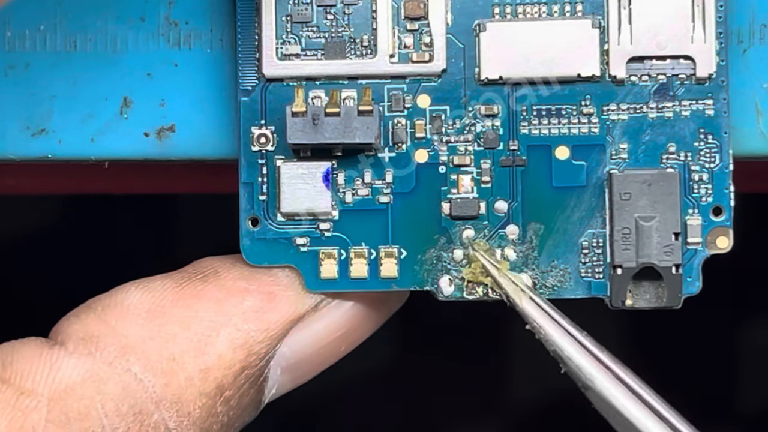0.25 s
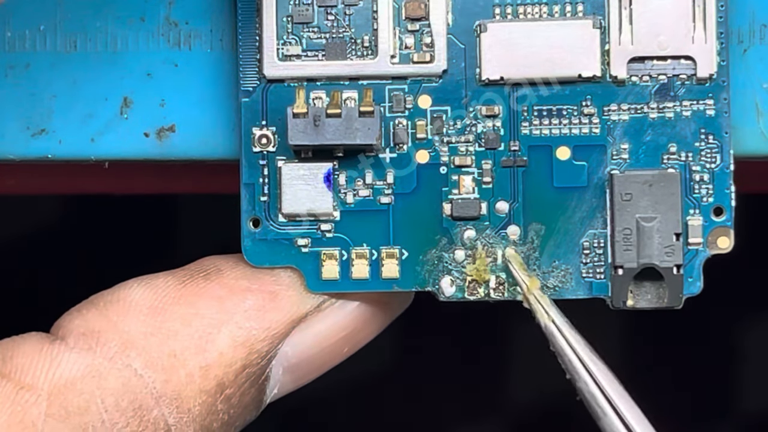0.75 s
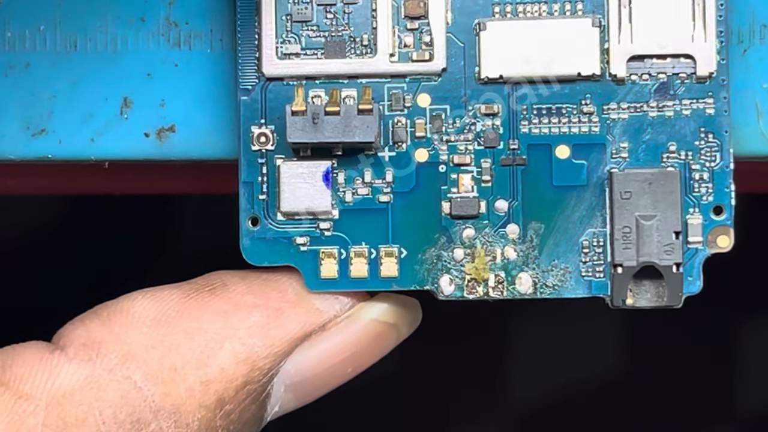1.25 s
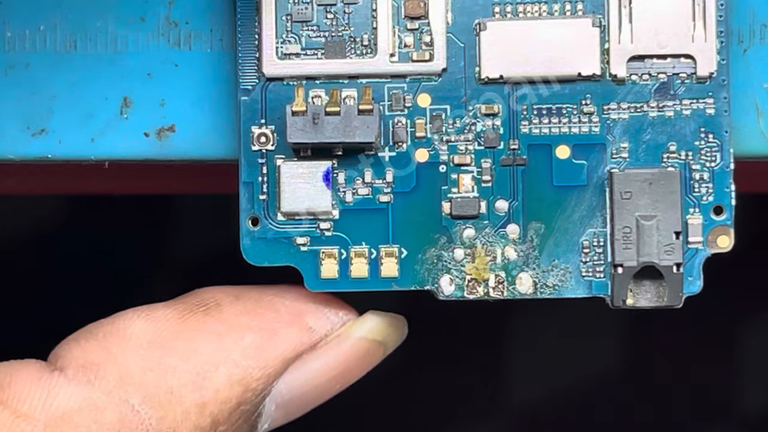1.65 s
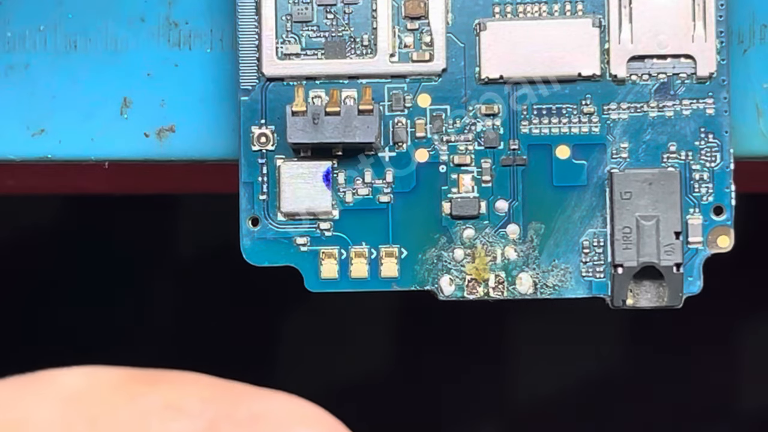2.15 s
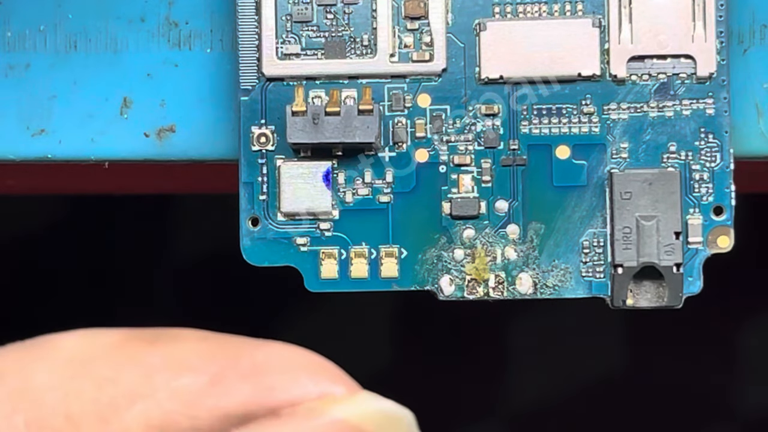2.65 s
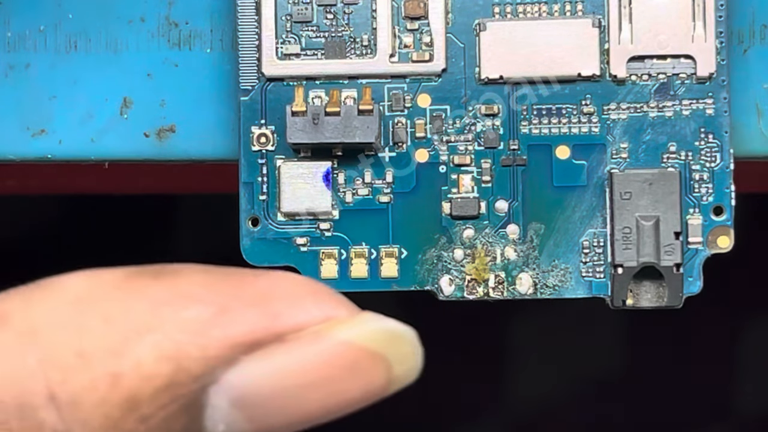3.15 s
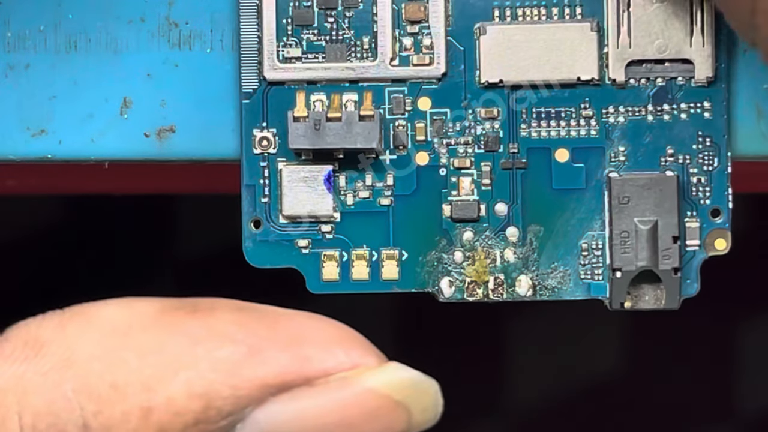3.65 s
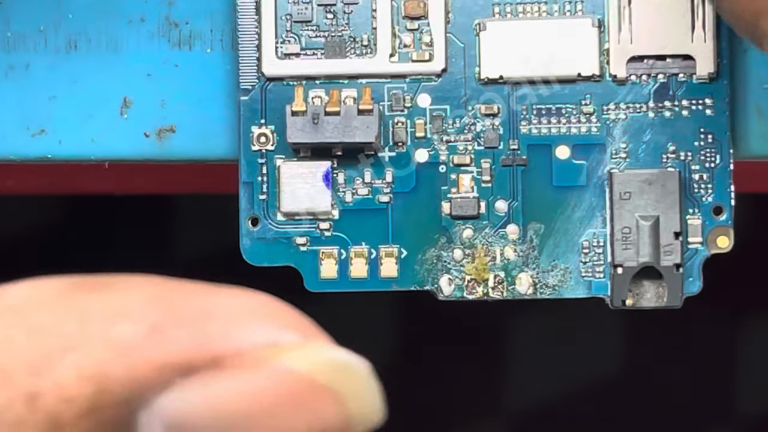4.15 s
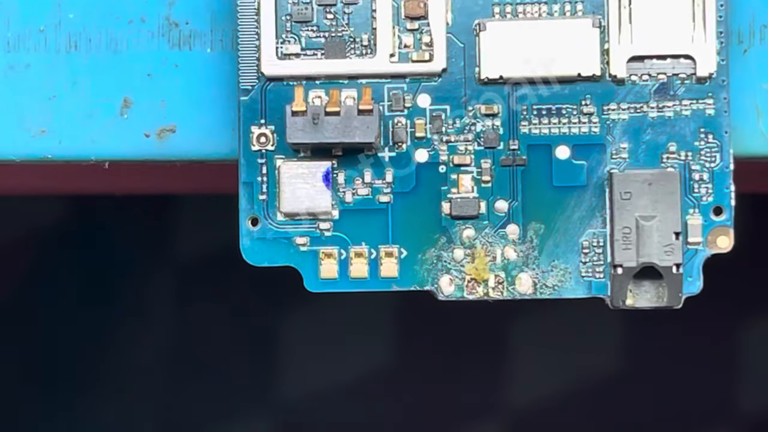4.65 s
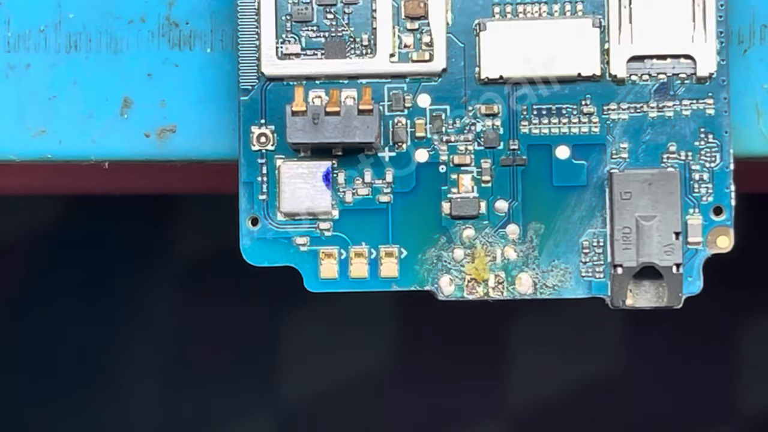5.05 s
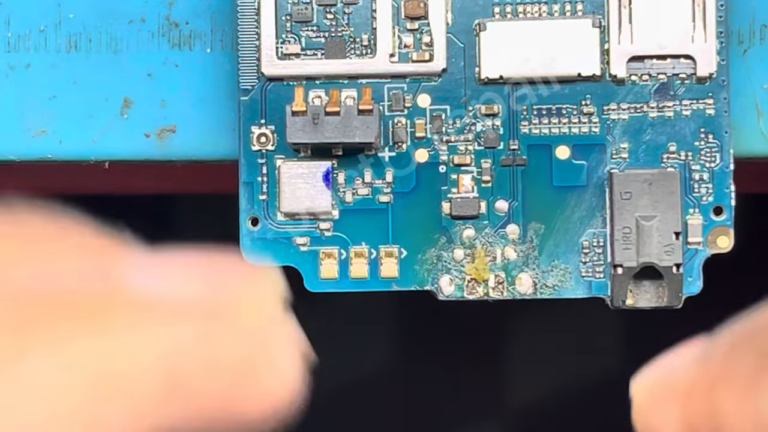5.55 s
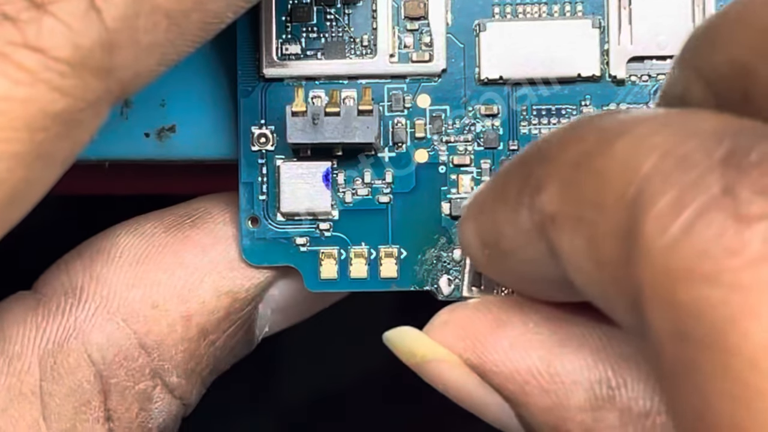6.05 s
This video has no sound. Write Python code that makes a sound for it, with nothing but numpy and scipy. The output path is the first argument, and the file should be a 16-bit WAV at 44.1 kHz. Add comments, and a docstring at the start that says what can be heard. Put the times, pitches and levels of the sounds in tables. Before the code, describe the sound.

Quiet close repair work: tiny clicks, a sudden hard clank and rattle of dropped tweezers, then soft snaps and skin rubs over low bench rumble.

```python
"""Still air and a low bench rumble, then a faint tick: steel tweezers pick at a small circuit board.
Dropped on the workbench, they thud, bounce, ring and rattle to rest: decaying modes, noise cracks and a buzz.
Fingers then press a tiny connector on the board: gritty noise ticks, swelling skin rubs, soft sine bumps.
A quiet room adds a dull tail; two close ports of a phone above the work make the stereo."""
import sys
import numpy as np
from scipy import signal
from scipy.fft import rfft, irfft, next_fast_len
from scipy.io import wavfile
from scipy.ndimage import uniform_filter1d

SR = 44100
rng = np.random.default_rng(int(sys.argv[2]) if len(sys.argv) > 2 else 0)


def output_pcm(signal):
    """Save a mono or channel-first signal as 16-bit PCM at the path in sys.argv[1].

    Samples are clipped to [-1, 1] before scaling.
    """
    pcm = np.clip(np.atleast_2d(signal).T, -1, 1) * 32767
    wavfile.write(sys.argv[1], SR, np.round(pcm).astype(np.int16))


N = 277830
TIME = np.arange(N) / SR
AGE = np.arange(int(.7 * SR)) / SR  # time since the onset of one sound, s


def from_db(db):
    """Decibels to gain."""
    return 10 ** (np.asarray(db) / 20)


def rms_one(x):
    """Scale to unit power."""
    return x / np.sqrt(np.mean(x ** 2) + 1e-20)


def at_hz(points, hz):
    """Read a spectrum on a log-frequency axis."""
    f, value = np.transpose(points)
    return np.interp(np.log(hz + 1), np.log(f), value)


def add(track, s, sound):
    """Mix a sound into a stereo track from time s on."""
    start = max(round(s * SR), 0)
    track[:, start:start + sound.shape[-1]] += sound[..., :N - start]


def dying(t60, rise=0.0004):
    """Quick rise, then an exponential decay; both times in seconds."""
    return from_db(-60 * AGE / t60) * (1 - np.exp(-AGE / rise))


# unshared part of diffuse sound at the two ports: freq_hz, level_db
PORT_SPREAD = [(60, -34.5), (250, -9), (600, -1.5), (1200, -2.5), (2500, -10.5), (4500, -14), (6000, -23.5),
               (8500, -8.5), (10200, -27), (14000, -13)]


def noise(spectrum, size):
    """Coloured stereo noise of unit power, mostly shared by both ports."""
    fft_size = next_fast_len(size)
    hz = np.fft.rfftfreq(fft_size, 1 / SR)
    shared, own = rfft(rng.standard_normal((2, fft_size)))
    opposite = np.array([[1], [-1]])
    pair = shared + own * from_db(at_hz(PORT_SPREAD, hz)) * opposite
    coloured = irfft(pair * from_db(at_hz(spectrum, hz)), fft_size)
    return rms_one(coloured[:, :size])


def hump(centre_hz, fall_db):
    """A broad spectrum that falls by fall_db an octave away from its centre."""
    return [(centre_hz * 2. ** k, -fall_db * abs(k) ** 1.4) for k in np.linspace(-4, 2, 13)]


def softened(x, hz):
    """A softer contact passes less treble."""
    return signal.sosfilt(signal.butter(2, min(hz, SR / 3), fs=SR, output="sos"), x)


def ring(drive, hz, t60):
    """One mode as a resonator: a unit click sets a sine of height near 1 ringing."""
    radius = from_db(-60 / (t60 * SR))
    angle = 2 * np.pi * hz / SR
    return signal.lfilter([0, np.sin(angle)], [1, -2 * radius * np.cos(angle), radius ** 2], drive + 1e-18)


def grain(size, rough_db, count=30):
    """Uneven gain of many tiny slips, smoothed over count samples."""
    wander = rms_one(uniform_filter1d(rng.standard_normal(size), count))
    return rms_one(from_db(rough_db * wander))


# colour of the still air: freq_hz, level_db
AIR = [(100, 3), (500, 1.5), (900, -6.5), (1700, -6.5), (2400, -12), (4000, -12), (8000, -17),
       (13000, -20.5), (15000, -24), (16500, -44.5)]
AIR_DB = -72.5


def air():
    """The quiet room's steady hiss, strongest in the low end."""
    return from_db(AIR_DB) * noise(AIR, N)


# a hand moves and its sleeve with it: start_s, length_s, bench_rumble_db, soft_rustle_db (before trims)
MOVES = [(0, 0.039, -50.5, -64), (0.46, .08, -57, -64.5), (1.19, .47, -57, -66.5), (1.801, .25, -58.5, -94),
         (2.48, 0.17, -52, -74), (3.324, 0.42, -50, -58.5), (3.766, 0.4, -49, -75), (4.252, .33, -51, -100),
         (4.866, .19, -44, -88), (5.581, 0.16, -47.5, -78.5), (5.88, 0.06, -43, -61.5),
         (6.159, 0.088, -52, -55.5)]
# a short swell and fade around each move, over a floor that never quite rests
MOVE_ATTACK_S, MOVE_RELEASE_S = 0.052, .06
RESTING_RUMBLE_DB, RESTING_RUSTLE_DB = -58, -75.5  # before trims
# colour of the bench rumble: freq_hz, level_db
RUMBLE = [(20, -26.5), (35, -9), (58, 5.5), (80, -3), (115, -11.5), (170, -26), (300, -62.5)]
# colour of the sleeve rustle: freq_hz, level_db
RUSTLE = [(80, -13.5), (160, 3.5), (340, -2.5), (550, -18.5), (900, -23), (2000, -25.5), (5000, -46.5)]
# soft bumps of the bench, under the hands or the dropped tool: start_s, level_db (before trim), pitch_hz
BUMPS = [(0.496, -42, 108), (0.683, -45.5, 116), (2.183, -22, 61.2), (2.244, -20.5, 90.04),
         (2.457, -31, 88.9), (2.536, -41.5, 65), (3.384, -29, 89.87), (3.550, -31, 88.05),
         (3.684, -35, 118.7), (3.938, -37, 81.4), (5.596, -35, 63.3), (5.925, -35, 58.3)]


def hands(bump_t60=.085, bump_rise=0.0067, bump_trim_db=3, rumble_trim_db=-2, rustle_trim_db=-1):
    """Soft bumps and a low rumble come through the bench; sleeves rustle. Each move swells, holds and fades."""
    rumble, rustle = from_db(RESTING_RUMBLE_DB), from_db(RESTING_RUSTLE_DB)
    for s, length, move_rumble_db, move_rustle_db in MOVES:
        swell = np.clip((TIME - s) / MOVE_ATTACK_S, 0, 1)
        fade = np.clip(1 - (TIME - s - length) / MOVE_RELEASE_S, 0, 1)
        effort = swell * fade
        # unrelated noises add as powers
        rumble = np.hypot(rumble, from_db(move_rumble_db) * effort)
        rustle = np.hypot(rustle, from_db(move_rustle_db) * effort)
    out = from_db(rumble_trim_db) * rumble * noise(RUMBLE, N)
    out += from_db(rustle_trim_db) * rustle * noise(RUSTLE, N)
    for s, db, hz in BUMPS:
        bump = -np.sin(2 * np.pi * hz * AGE) * dying(bump_t60, bump_rise)
        add(out, s, from_db(db + bump_trim_db) * bump)
    return out


# small metal on the board and between the fingers: start_s, board_db, bright_snap_db (before trim), t60_s
TICKS = [(0.0184, -41.5, -78, 0.013), (0.242, -59.5, -64, 0.021), (0.477, -42.5, -43, 0.049),
         (0.524, -52.5, -67, 0.029), (0.665, -57, -69, 0.069), (0.8319, -41.5, -55, 0.031),
         (1.465, -50, -56.5, .1), (1.7982, -48.5, -46.5, 0.018), (3.373, -37, -30, 0.027),
         (3.4562, -44.5, -26, 0.032), (3.486, -55, -37.5, 0.012), (3.505, -54, -48, .025),
         (3.6145, -59, -51, 0.063), (3.637, -45, -45, 0.016), (3.6550, -45, -43.5, 0.025),
         (3.8649, -40, -44, 0.014), (3.9729, -49.5, -46, 0.049), (4.8230, -51, -41.5, 0.016),
         (4.8687, -69, -43, 0.0096), (5.852, -44, -55, 0.026), (5.9105, -43, -72, 0.012)]
# colour of the damped board: freq_hz, level_db
BOARD = [(300, 0.5), (1050, -26), (1500, -11), (1900, -11.5), (2190, -1), (2700, -8.5), (3350, 2),
         (3950, 3.5), (4300, -1), (4800, 6), (5800, -22), (9000, -68), (16000, -13)]
# ringing modes of the board: pitch_hz, t60_s
BOARD_MODES = [(2190, 0.075), (3350, 0.064), (3960, 0.032), (4560, 0.0623)]
# colour of the bright snap: freq_hz, level_db
SNAP = [(1500, -32), (4000, -4.5), (6000, -2.5), (7400, 6.5), (9000, -1), (11000, -1.5), (13000, -1),
        (15500, -8), (17000, 4)]


def ticks(rough_db=4.5, ring_db=-20, tail_db=-22, tail_t60=0.19, trim_db=-1):
    """A tip slips off an edge: a gritty snap, the damped board under it and a faint tail."""
    out = np.zeros((2, N))
    for s, board_db, snap_db, t60 in TICKS:
        sound = from_db(board_db) * noise(BOARD, len(AGE)) + from_db(snap_db) * noise(SNAP, len(AGE))
        gritty = dying(t60) * grain(len(AGE), rough_db)
        tail = from_db(tail_db) * dying(tail_t60)
        add(out, s, sound * (gritty + tail))
        for hz, mode_t60 in BOARD_MODES:
            strength = from_db(board_db + ring_db + 2 * rng.standard_normal())
            add(out, s, strength * np.sin(2 * np.pi * hz * AGE) * dying(mode_t60))
    return from_db(trim_db) * out


# blows that reach the bench top: start_s, thud_db, lasting_ring_db, contact_hardness_hz (treble cutoff)
KNOCKS = [(0.479, -57, -60, 1270), (0.668, -66, -64.5, 870), (0.833, -74, -68, 1300),
          (2.147, -46.5, -50, 405.9), (2.1590, -34.5, -44, 606), (2.1680, -21.5, -25.5, 960),
          (2.1725, -10, -28.5, 864), (2.18, -28, -34.5, 680), (2.238, -26, -23.5, 2394),
          (2.2600, -28.5, -33, 1400), (2.3150, -36.5, -37, 1700), (2.3340, -38.5, -36, 1900),
          (2.436, -54, -49.5, 2190), (5.912, -69, -63.5, 2990)]
# modes of the bench top, short ones for the thud and long ones that linger: pitch_hz, level_db, t60_s
BENCH = [(58.24, -15, 0.36), (96.4, -9.5, 0.1), (141, -15.5, 0.56), (225, -4, 0.051), (330.8, -8.5, .35),
         (348, -12, 0.7), (395, -6, 0.085), (477.8, -12, .4), (530, -9.5, 0.054), (592, -1, 0.038),
         (622.4, -12, 0.29), (710.7, -7, 0.021), (745, -11, 0.2), (805, 7, 0.022), (873, -11.5, .3),
         (976, -6.5, 0.044), (1029, -18, 0.33), (1208, -15.5, 0.24), (1298, -13.5, 0.082), (1346, -7, 0.11),
         (1646, -15.5, 0.16), (1650, -13, 0.31), (1834, -11.5, 0.32)]
# colour of the dense lingering wash: freq_hz, level_db
BENCH_WASH = [(30, -24), (55, 1.5), (100, 1), (140, -1.5), (220, 2), (280, -6), (380, 1), (530, -8),
              (820, -6.5), (1000, -17), (1400, -8.5), (1850, -14.5), (2600, -16.5), (5000, -21),
              (9000, -29)]


def bench(thud_t60=.1, ring_db=0, wash_db=1, wash_t60=0.35, wash_rise=0.00067, build_cycles=0.68):
    """The top thuds briefly; its long modes and a wash of denser ones linger."""
    out = np.zeros((2, N))
    thud, lasting = np.zeros((2, len(AGE)))
    for k, (hz, db, t60) in enumerate(BENCH):
        sign = (-1) ** k
        mode = sign * from_db(db) * np.sin(2 * np.pi * hz * AGE) * dying(t60, build_cycles / hz)
        if t60 < thud_t60:
            thud = thud + mode
        else:
            lasting = lasting + mode
    for s, thud_db, lasting_db, hard_hz in KNOCKS:
        wash = from_db(wash_db) * noise(BENCH_WASH, len(AGE)) * dying(wash_t60, wash_rise)
        lingering = wash + from_db(ring_db) * lasting
        blow = from_db(thud_db) * thud + from_db(lasting_db) * lingering
        add(out, s, softened(blow, hard_hz))
    return out


# a tip or a nail scrapes over the board: middle_s, spread_s (Gaussian), level_db, centre_hz
SCRAPES = [(0.821, 0.012, -60.5, 3730), (1.278, 0.033, -70.5, 4180), (1.392, 0.027, -70, 3270),
           (1.493, 0.038, -62.5, 2600), (3.162, 0.019, -69.5, 2830), (3.51, 0.052, -66.5, 3830),
           (3.649, .025, -60, 3300), (3.869, 0.052, -68.5, 4700), (4.042, .02, -62.5, 4250),
           (4.404, .13, -76.5, 2624), (4.83, 0.011, -59, 4200), (5.914, 0.0017, -50, 1650),
           (6.153, 0.012, -66.5, 4190), (6.209, 0.019, -58.5, 3900)]
SCRAPE_BODY_HZ, SCRAPE_BODY_DB = 1700, -3.5
# dry skin slides on skin and metal: middle_s, spread_s (Gaussian), level_db
SWISHES = [(1.378, 0.14, -79.5), (1.725, 0.09, -67), (1.901, .026, -57.5), (3.498, 0.041, -68),
           (3.649, .022, -63.5), (4.017, .032, -66), (4.16, 0.019, -69), (4.39, 0.13, -73),
           (4.805, 0.042, -63.5), (5.108, .028, -77.5), (5.58, .04, -78.5)]
SWISH_HZ = 10100  # centre of the skin's hiss


def rubs(fall_db=19, skirt_db=-17, rough_db=4.0, board_colour=0.099,
         swish_fall_db=17, swish_skirt_db=-18, swish_rough_db=3.0):
    """Friction swells and fades with each short stroke; strokes on the board take on its resonances."""
    out = np.zeros((2, N))
    middle = AGE[-1] / 2
    hz = np.geomspace(200, SR / 2, 90)

    def stroke(spread, colour_db, grain_db):
        """Grainy noise under a bell-shaped swell."""
        swell = np.exp(-((AGE - middle) / spread) ** 2 / 2) * signal.windows.tukey(len(AGE))
        hiss = noise(np.column_stack([hz, colour_db]), len(AGE))
        return swell * hiss * grain(len(AGE), grain_db)

    body = np.maximum(SCRAPE_BODY_DB + at_hz(hump(SCRAPE_BODY_HZ, fall_db), hz), skirt_db)
    for s, spread, db, centre_hz in SCRAPES:
        colour = np.maximum(at_hz(hump(centre_hz, fall_db), hz), body)
        colour = colour + board_colour * at_hz(BOARD, hz)
        add(out, s - middle, from_db(db) * stroke(spread, colour, rough_db))
    skin = np.maximum(at_hz(hump(SWISH_HZ, swish_fall_db), hz), swish_skirt_db)
    for s, spread, db in SWISHES:
        add(out, s - middle, from_db(db) * stroke(spread, skin, swish_rough_db))
    return out


# the tweezers land on the bench: start_s, ring_db (before trim), favoured_mode_hz, crack_db, crack_centre_hz
LANDINGS = [(2.1639, -54.5, 2540, -30.5, 1860), (2.1692, -28.5, 9310, -17, 4640),
            (2.1812, -23, 8440, -20.5, 7640), (2.2372, -46, 6845, -15, 3605),
            (2.2470, -50, 4015, -26.5, 3700), (2.3107, -40, 9310, -20, 9910),
            (2.3339, -26.5, 5437, -18.5, 10050), (2.3479, -34.5, 8440, -37.5, 8130),
            (2.355, -34, 4015, -24, 8000), (2.386, -45.5, 8420, -43.5, 10300),
            (2.395, -44.5, 5437, -39, 9000), (2.4089, -43, 12920, -31, 12440),
            (2.417, -34, 12920, -35, 8330), (2.4360, -54, 2546, -31, 2970), (2.4526, -50, 8165, -53, 8370),
            (2.5530, -82, 2546, -42.5, 3734)]
FAVOUR_OCTAVES = .06  # reach of a landing around its favoured mode
# the other arm follows each landing, weaker and flatter, so that it favours the low modes
FOLLOW_S, FOLLOW_RING_DB, FOLLOW_CRACK_DB = .0033, -10.5, -8.5
FOLLOW_MODE_HZ, FOLLOW_OCTAVES = 3119, .55


def contacts():
    """Two contacts per landing: start_s, ring_db, favoured_hz, reach_octaves, crack_db, crack_hz."""
    for s, ring_db, favoured_hz, crack_db, crack_hz in LANDINGS:
        yield s, ring_db, favoured_hz, FAVOUR_OCTAVES, crack_db, crack_hz
        yield (s + FOLLOW_S, ring_db + FOLLOW_RING_DB, FOLLOW_MODE_HZ, FOLLOW_OCTAVES,
               crack_db + FOLLOW_CRACK_DB, crack_hz)


# bending modes of the steel arms, ringing freely: pitch_hz, level_db, t60_s
STEEL = [(2535, -10, 0.15), (3024, -22.5, 0.13), (3615, -14.5, 0.16), (4028, -12.5, .11),
         (4560, -16.5, 0.022), (4940, -14, 0.061), (5430, -3.5, 0.085), (6870, -13.5, 0.33),
         (7020, -16, 0.057), (8165, -11, 0.073), (8450, -5.5, .1), (9070, -8.5, 0.076), (9310, 0, .055),
         (11060, -5, 0.082), (11260, -8, .06), (12100, -16.5, 0.08), (13100, -4, 0.085),
         (14100, -7.5, .045)]


def tweezers(favour_db=12, scatter_db=4.5, crack_t60=0.013, crack_fall_db=9.0, arms_apart=0.0023,
             second_arm_db=-10, touch_lift_db=0.5, ring_trim_db=-2):
    """Each contact cracks and rings both arms; where it lands decides which modes are favoured."""
    out = np.zeros((2, N))
    hz, mode_db, t60 = np.transpose(STEEL)
    # the arms are not quite alike, so their modes beat
    first_arm = np.sin(2 * np.pi * np.outer(hz, AGE))
    second_arm = np.sin(2 * np.pi * np.outer(hz * (1 - arms_apart), AGE))
    arms = first_arm + from_db(second_arm_db) * second_arm
    modes = arms * np.array([dying(t) for t in t60])
    touches = np.array(list(contacts()))
    count = np.searchsorted(np.sort(touches[:, 0]), TIME).astype(float)
    touches_so_far = uniform_filter1d(count, size=130)
    for s, ring_db, favoured_hz, reach, crack_db, crack_hz in touches:
        favoured = np.exp(-(np.log2(hz / favoured_hz) / reach) ** 2)
        scatter = scatter_db * rng.standard_normal(len(hz))
        ringing = from_db(ring_trim_db + ring_db + mode_db + favour_db * favoured + scatter) @ modes
        # every later touch slightly lifts what is still ringing
        later = np.interp(s + AGE, TIME, touches_so_far) - np.interp(s, TIME, touches_so_far)
        add(out, s, ringing * from_db(touch_lift_db * np.maximum(later - .5, 0)))
        crack = noise(hump(crack_hz, crack_fall_db), len(AGE)) * dying(crack_t60)
        add(out, s, from_db(crack_db) * crack)
    return out


# the arms chatter faster, up to a limit, as they settle: the level sags slowly, then falls away
RATTLE_START_S, RATTLE_HOLD_S, RATTLE_DB = 2.314, 0.17, -38.5  # level before the steel and buzz trims
RATTLE_SAG_DB_PER_S, RATTLE_RELEASE_DB_PER_S = 21.5, 309  # the release adds to the sag
FIRST_TOUCHES_PER_S, MOST_TOUCHES_PER_S, TOUCHES_DOUBLE_S = 200, 360, 0.095
# colour of the merged buzz: freq_hz, level_db
RATTLE_COLOUR = [(1200, -10), (2500, 2.5), (4500, -27), (5400, -10), (6100, -3.5), (7000, 5), (8300, 17),
                 (10000, -7), (11000, 4), (12000, -1.5), (13000, 3.5), (15000, -7), (16500, -27.5)]


def rattle(steel_trim_db=-0.5, buzz_trim_db=-4, rough_db=3.0, held=0.21, light_hz=6000):
    """Ever smaller bounces merge into a steel buzz; lying on the bench shortens the ring."""
    age = np.maximum(TIME - RATTLE_START_S, 0)
    released = np.maximum(age - RATTLE_HOLD_S, 0)
    level_db = RATTLE_DB - RATTLE_SAG_DB_PER_S * age - RATTLE_RELEASE_DB_PER_S * released
    per_s = np.minimum(FIRST_TOUCHES_PER_S * 2 ** (age / TOUCHES_DOUBLE_S), MOST_TOUCHES_PER_S)
    touches = (rng.random(N) < per_s / SR) / np.sqrt(per_s)
    steel = np.zeros(N)
    for hz, db, t60 in STEEL:
        # light touches drive the low modes weakly, and each one drives every mode differently
        lightness = min(hz / light_hz, 1) ** 2
        drive = touches * rng.standard_normal(N)
        steel += from_db(db) * lightness * ring(drive, hz, t60 * held)
    buzz = noise(RATTLE_COLOUR, N) * grain(N, rough_db, count=90)
    mix = from_db(steel_trim_db) * rms_one(steel) + from_db(buzz_trim_db) * buzz
    return (age > 0) * from_db(level_db) * mix


def room(x, wet_db=-19, t60=.27, wall_hz=7000, build=0.0053):
    """A faint, dull tail of reflections: convolution with decaying, softened noise."""
    tail = softened(noise(hump(wall_hz, 0), len(AGE)), wall_hz) * dying(t60, build)
    tail = tail / np.sqrt(np.sum(tail ** 2) / 2)
    return x + from_db(wet_db) * signal.fftconvolve(x, tail, axes=1)[:, :N]


def scene():
    """The still air, the fine handwork and the dropped tweezers; only the drop and knocks excite the room."""
    handwork = hands() + ticks() + rubs()
    return air() + handwork + room(bench() + tweezers() + rattle())


# phase by which the left port leads: freq_hz, lead_rad
PORT_PHASE = [(0, 0), (300, -.1), (900, -.6), (1800, -.2), (2600, 2.2), (3700, .9), (5000, 1.5),
              (6000, 3.2), (7600, 6.1), (8300, 6.4), (10150, 9.45), (12000, 12.4), (12800, 12.8),
              (14600, 15.7), (16500, 16.8)]
# level of the left port over the right: freq_hz, difference_db
PORT_BALANCE = [(100, 0), (220, 0.5), (380, -1.5), (700, 1.5), (1300, 2.5), (2400, 1), (4400, -0.5),
                (15000, 0)]
# response common to both ports: freq_hz, level_db
MICROPHONE = [(18, -26.5), (30, -9), (42, 1.5), (60, 1.5), (130, 2), (13500, -4), (15200, -5),
              (16200, -10.5)]
CUTOFF_HZ = 16300


def record(dry):
    """The two ports differ in phase and level; both ends of the range roll off."""
    size = next_fast_len(N + len(AGE))
    hz = np.fft.rfftfreq(size, 1 / SR)
    side = np.array([[.5], [-.5]])  # each port takes half of the difference
    phase = np.exp(1j * side * np.interp(hz, *np.transpose(PORT_PHASE)))
    level = from_db(side * at_hz(PORT_BALANCE, hz) + at_hz(MICROPHONE, hz))
    heard = irfft(rfft(dry, size) * phase * level, size)[:, :N]
    return signal.sosfilt(signal.ellip(10, .2, 80, CUTOFF_HZ, fs=SR, output="sos"), heard)


dry = scene()
out = record(dry)
output_pcm(out)
```